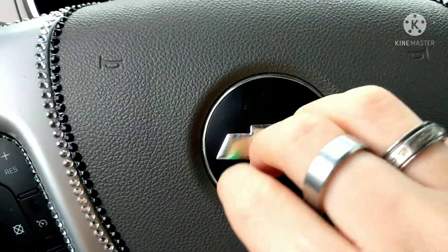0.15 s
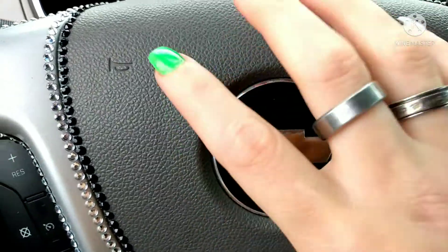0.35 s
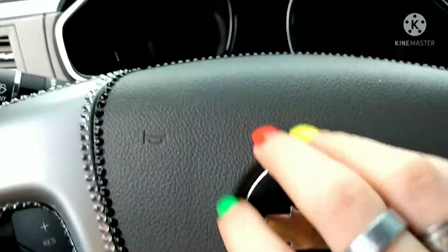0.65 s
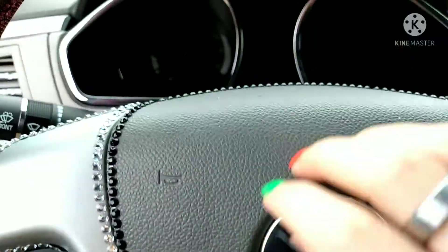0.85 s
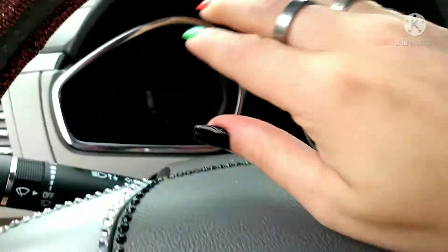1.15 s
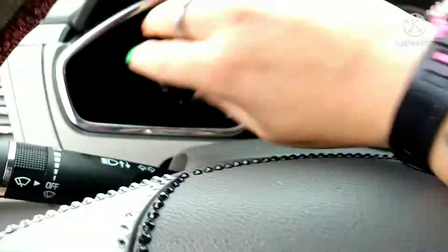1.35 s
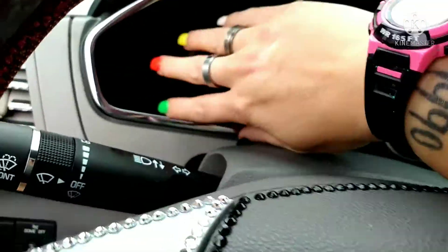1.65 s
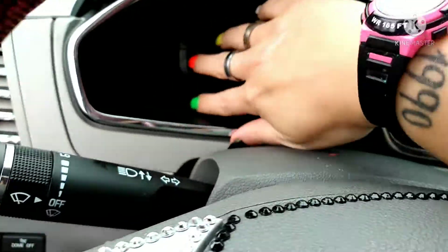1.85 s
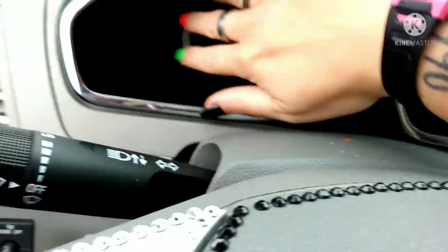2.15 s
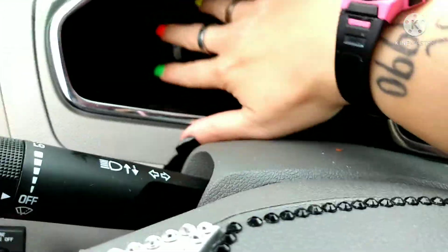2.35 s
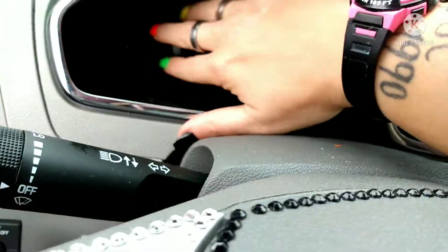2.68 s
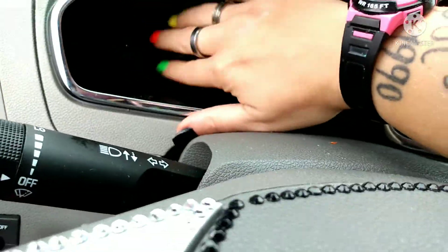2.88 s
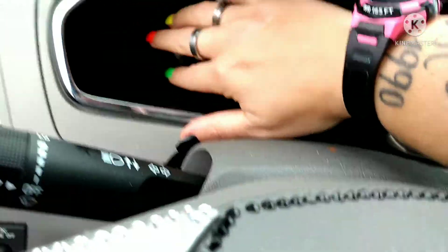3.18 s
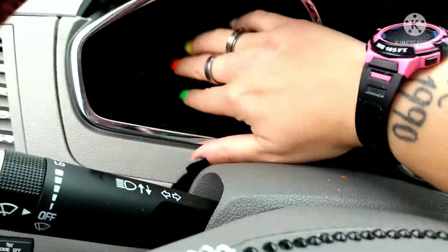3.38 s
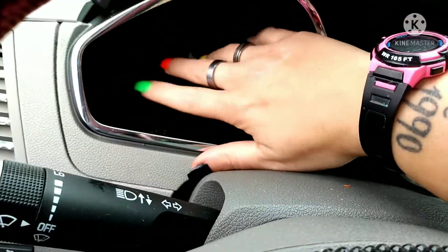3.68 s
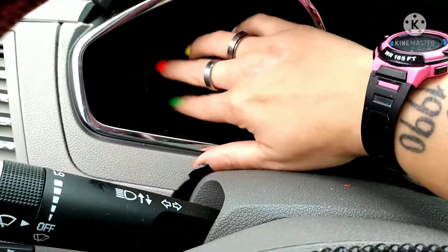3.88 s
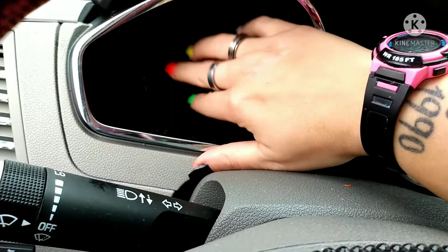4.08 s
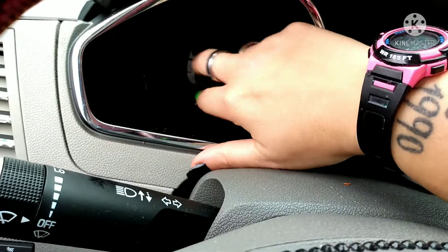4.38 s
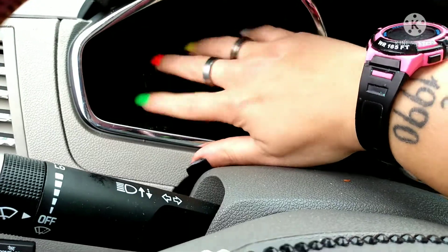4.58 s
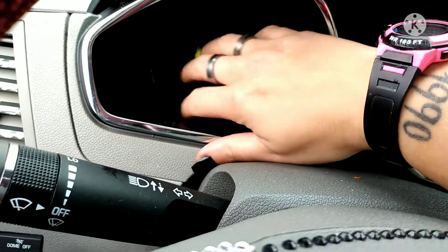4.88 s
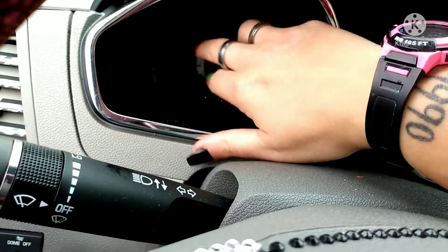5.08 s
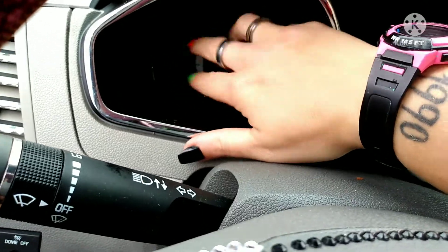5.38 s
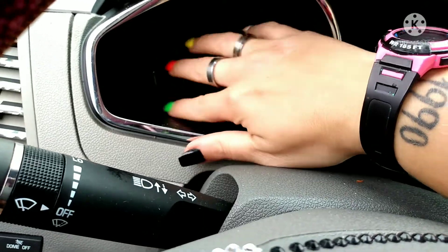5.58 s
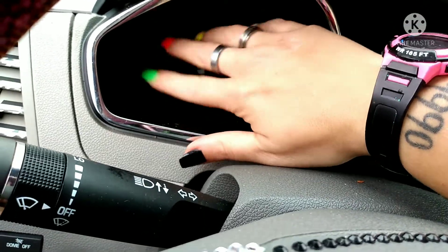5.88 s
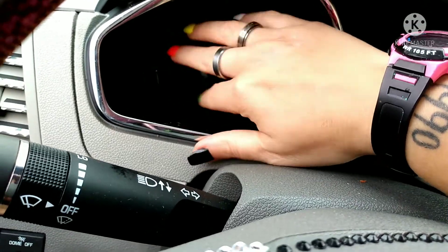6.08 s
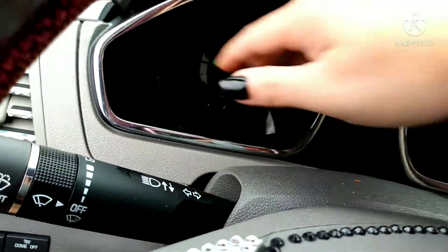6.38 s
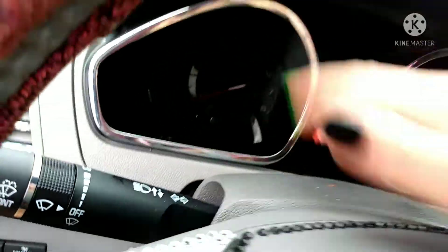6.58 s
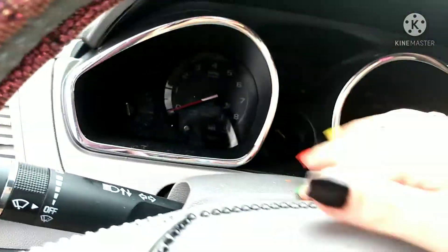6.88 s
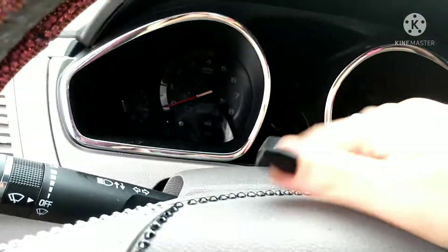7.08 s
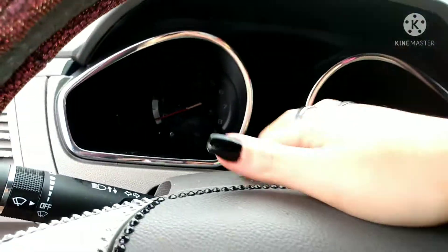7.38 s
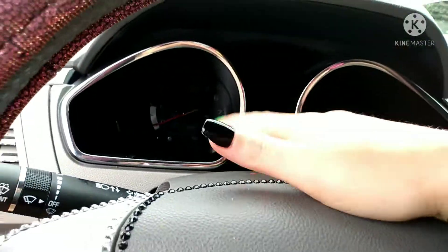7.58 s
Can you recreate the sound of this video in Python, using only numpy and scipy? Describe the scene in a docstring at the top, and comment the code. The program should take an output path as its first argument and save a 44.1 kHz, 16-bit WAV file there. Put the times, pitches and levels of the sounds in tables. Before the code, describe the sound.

Close, dry nail sounds inside a quiet parked car, over a faint low hum and soft air noise. From 0 to 0.3 s a gritty scratch swells across a grained pad, with a tight cluster of firm knocks at 0.14-0.22 s. A second, duller scratch runs from 0.6 to 0.9 s with a strong knock near 0.8. From 1 to 2.4 s there are only faint rubs, tiny ticks and soft bumps. At about 2.45 s nails begin drumming on a hollow clear lens, thickening from 3.1 to 4.5 s into quick, uneven galloping clacks. Looser taps continue to 6.3 s, with gaps, small rubs and dull fingertip thuds around 4.85 and 5.26. After a short lull, quieter hard ticks and brief scrapes on trim run from 6.8 to 7.6 s. Each tap leaves a very short dull echo; treble is limited.

```python
"""Long fingernails scratch and tap the grained pad of a steering wheel, over a low cabin hum.
They then drum in quick runs on the clear plastic lens over the gauges and tick on the hard trim beside it.
Scratches and slides are filtered crackle; taps are decaying modes with a noisy knock and click.
A dull short echo follows the nails in the quiet parked car; a close phone microphone has a narrow band."""
import sys
import numpy as np
from scipy import signal
from scipy.fft import rfft, irfft
from scipy.io import wavfile

SR = 44100
rng = np.random.default_rng(int(sys.argv[2]) if len(sys.argv) > 2 else 0)


def invert_db(x):
    """Field ratio 10**(x/20) for x, a level in decibels (scalar or array-like)."""
    u = np.asarray(x, float) / 20
    return 10 ** u


def int16_out(signal):
    """Quantize to a 16-bit WAV file."""
    q = np.round(np.clip(np.atleast_2d(signal).T, -1, 1) * 32767)
    wavfile.write(sys.argv[1], SR, q.astype(np.int16))


N = 341321

# Spectrum of a nail click. Each row: frequency in Hz, density in dB per Hz.
CLICK_SPECTRUM = [(1500, -24), (3000, -10), (3900, -3), (5200, -6.5), (6500, -2.5), (7500, -3.5)]
# Spectrum of rubbed plastic. Each row: frequency in Hz, density in dB per Hz.
GRAIN_SPECTRUM = [(150, -3), (400, -5), (900, 4.5), (1500, -2), (2500, -10), (4000, -11.5), (8000, -19)]


def evened(x):
    """Scales to rms 1."""
    return x / np.sqrt(np.mean(x ** 2) + 1e-20)


def add(mix, start_s, sound):
    """Mixes a sound in at its start time."""
    part = mix[round(start_s * SR):][:len(sound)]
    part += sound[:len(part)]


def colour(x, spectrum, tilt_db=0):
    """Filters by a (Hz, dB) spectrum, tilted in dB per octave about 1 kHz, no further below 300 Hz."""
    hz = np.fft.rfftfreq(len(x), 1 / SR) + 20
    point_hz, point_db = np.transpose(spectrum)
    gain_db = np.interp(np.log(hz), np.log(point_hz), point_db)
    gain_db += tilt_db * np.log2(np.maximum(hz / 1000, .3))
    return irfft(rfft(x) * invert_db(gain_db), len(x))


def crackle(count, per_s, spread_db, ring_s):
    """A nail skipping over grain: many tiny ticks, a few large, each a brief noise burst, over fine hiss."""
    hit = rng.random(count) < per_s / SR
    size = np.minimum(rng.exponential(1, count), 3.5)
    hiss = rng.standard_normal(count)
    ticks = hit * invert_db(spread_db * size)
    envelope = signal.lfilter([1], [1, -invert_db(-60 / (ring_s * SR))], ticks)
    return evened((envelope + .5) * hiss)


def scratches():
    """Long strokes: crackle through the pad; the nail edge adds treble on its own course."""
    # Two strokes. Each row: time in seconds, pressure in dB, treble in dB re pressure.
    strokes = [
        [(0, -57, -6), (.055, -51, -9), (.075, -45, -2.5), (.12, -41.5, -5), (.14, -40, 3), (.2, -37.5, 3),
         (.23, -49, -15), (.262, -58.5, 7), (.28, -79, -6)],
        [(.6, -74, 6), (.64, -60.5, 6), (.665, -49, -4), (.715, -48, -31), (.74, -40, -26.5), (.81, -37, -19),
         (.835, -46.5, 6), (.87, -55, 2), (.89, -72, 0)],
    ]
    # Scratched pad. Each row: frequency in Hz, density in dB per Hz.
    rasp = [(200, 0), (600, 2), (1200, 6), (2500, 0.5), (4000, -8), (6000, -20.5)]
    out = np.zeros(N)
    for rows in strokes:
        s, pressure_db, treble_db = np.transpose(rows)
        t = np.arange(s[0], s[-1], 1 / SR)
        ticks = crackle(count=len(t), per_s=700, spread_db=3.2, ring_s=.007)
        body = evened(colour(ticks, rasp))
        edge = evened(colour(ticks, CLICK_SPECTRUM, 3.3))
        stroke = body + invert_db(np.interp(t, s, treble_db)) * edge
        add(out, s[0], invert_db(np.interp(t, s, pressure_db)) * stroke)
    return out


def cabin():
    """Soft broad noise of the closed car and a few narrow, wavering humming bands of filtered noise."""
    # Broad noise. Each row: frequency in Hz, density in dB per Hz.
    broad = [(18, -53), (30, -21.5), (81, -4.5), (104, -16), (199, -8.5), (246, -20), (339, -15.5),
             (418, -25), (1010, -29), (7500, -45.5), (9750, -89.5), (16500, -120)]
    # Humming bands. Each row: frequency in Hz, width at half amplitude in Hz, level in dB rms.
    bands = [(80.1, 8.1, -58.5), (110, 63, -75), (148.4, 4, -67), (335.2, 8, -69.5)]
    wide, narrow = rng.standard_normal((2, N))
    hz = np.fft.rfftfreq(N, 1 / SR)
    out = invert_db(-58) * evened(colour(wide, broad))
    for centre_hz, width_hz, level_db in bands:
        resonance = 1 / (1 + ((hz - centre_hz) / width_hz * 2) ** 2)
        out += invert_db(level_db) * evened(irfft(rfft(narrow) * resonance, N))
    return out


def touches():
    """Every blow, thud and tick as (listed time in s, blow dB, spot 0-1 middle to rim, click dB re square)."""
    # Square nail blows. Each row: time in seconds, blow level in dB, spot 0-1 from middle to rim.
    blows = [(0.136, -15, 0.85), (0.162, -17.5, 0.26), (0.206, -17, 0.9), (0.815, -15.5, 0.44),
             (1.866, -40.5, 0.14), (2.459, -23, 0.61), (2.635, -30, 0.2), (2.74, -21.5, 0.8),
             (2.789, -28.5, 0.33), (2.8, -21.5, 0.57), (2.925, -25.5, 0.73), (3.008, -28, 0.3),
             (3.022, -22, 0.53), (3.133, -16, 0.27), (3.255, -37, 0.2), (3.271, -19, 0.45),
             (3.373, -15.5, 0.24), (3.458, -25.5, .33), (3.496, -17, 0.47), (3.616, -18, .27),
             (3.671, -22.5, 0.36), (3.701, -19.5, 0.54), (3.821, -18.5, 0.23), (3.888, -21.5, 0.28),
             (3.933, -21, 0.64), (4.086, -16, 0.16), (4.145, -21.5, 0.29), (4.176, -19.5, 0.4),
             (4.336, -17, 0.33), (4.411, -25, 0.33), (4.455, -19, 0.34), (4.746, -17, 0.32),
             (4.808, -21.5, 0.41), (5.092, -22, .47), (5.331, -40, 0.15), (5.43, -19.5, .43),
             (5.781, -38, 0.33), (5.837, -18, 0.64), (5.892, -25, 0.32), (5.922, -31.5, 0.47),
             (6.066, -20, 0.6), (6.081, -16, 0.3), (6.163, -35, .28), (6.284, -16, .3), (6.303, -20, 0.32),
             (6.791, -25.5, 0.66), (6.805, -24.5, .4), (7.112, -28, 0.56), (7.123, -24.5, 0.54),
             (7.183, -35, .9), (7.233, -34, 0.36), (7.333, -27.5, 0.7), (7.487, -44, 0.9)]
    # Dull blows, as of the fingertip landing first. Each row: time in seconds, blow level in dB, spot 0-1.
    thuds = [(0.171, -14.5, 0.27), (0.218, -28, 0.1), (0.226, -27.5, 0.07), (0.753, -42, .23),
             (0.792, -38, 0.1), (0.85, -21.5, 0.06), (1.051, -41.5, 0.08), (1.931, -43, .02),
             (1.973, -36.5, 0.56), (4.553, -35.5, .93), (4.85, -23.5, 0.39), (4.89, -43, 0.4),
             (4.916, -29, 0.63), (5.16, -38.5, 0.33), (5.189, -30.5, 0.25), (5.259, -19.5, 0.97),
             (5.526, -30.5, 0.28)]
    # Light bright ticks of the nail tip. Each row: time in seconds, blow level in dB.
    ticks = [(0.31, -55), (0.546, -53.5), (0.971, -49.5), (1.359, -51.5), (1.44, -46.5), (1.599, -44),
             (1.63, -41.5), (1.765, -42), (2.414, -37), (2.692, -42), (6.774, -35), (7.016, -31),
             (7.572, -33), (7.584, -29.5)]
    thud_click_db, tick_click_db = -20, 6
    tick_spot = 0.99  # ticks hardly drum
    return ([(*row, 0) for row in blows] + [(*row, thud_click_db) for row in thuds]
            + [(*row, tick_spot, tick_click_db) for row in ticks])


def surface_modes(place, spot, t):
    """The pushed-away surface rings in decaying cosines; returns upper modes and low drumming, each at peak 1."""
    # Modes of each surface. Each row: frequency in Hz, level in dB before the spot's changes, t60 in seconds.
    pad = [(121.4, 0, 0.17), (293, 12, 0.04), (718, -7.5, 0.011), (980, -10.5, 0.015), (1305, -15, 0.005)]
    lens = [(155, -9, .045), (333, 0, .06), (365, 0, .055), (600, -8, .05), (750, -7, .02),
            (825, -11, .065), (888, -8, .058), (1010, -11, .03), (1200, -13, .06), (1340, -19, .05),
            (1520, -8, .025), (1600, -13, .04), (1750, -6, .016), (2300, -15, .035), (2680, -22, .035),
            (3000, -23, .035)]
    trim = [(332, 0, 0.016), (706, -2, 0.037), (885, 10.5, 0.02), (1175, 9, 0.016), (2110, 10.5, 0.0052)]
    hz, mode_db, t60_s = np.transpose([pad, lens, trim][place])[:, :, None]
    chance = rng.standard_normal((len(hz), 1))  # where the nail lands changes each mode's share
    pitch_hz = hz * (1 + .004 * chance[::-1])
    rim = np.clip((spot - .27) / .53, 0, 1)  # near the rim: more and less even upper modes
    share_db = mode_db + (1.5 + 3.5 * rim) * chance + 9.0 * rim * np.log2(hz / 900)
    rings = -invert_db(share_db - 60 * t / t60_s) * np.cos(2 * np.pi * pitch_hz * t - .3)
    rings *= 1 - np.exp(-t / 0.00035)
    rings *= invert_db(-13 * np.clip((t - .015) / .012, 0, 1))  # the following fingertip mutes the ring
    deep = hz[:, 0] < 450
    # opposed neighbours: the drumming swells, then beats
    low = (-1.) ** np.arange(deep.sum()) @ rings[deep]
    upper = rings[~deep].sum(0)
    return upper / abs(upper).max(), low / abs(low).max()


def nail_click(noise, t, lead, sizzle_t60_s, sizzle_db, tilt_db):
    """A two-sample push with a decaying noise sizzle, filtered and scaled to a fixed energy."""
    sizzle = invert_db(sizzle_db - 60 * t / sizzle_t60_s) * noise / 4
    sizzle[:2] -= 1
    fade_in = np.minimum(t * SR / lead, 1) ** 2
    click = colour(np.roll(sizzle, lead), CLICK_SPECTRUM, tilt_db) * fade_in
    return click / np.sqrt((click ** 2).sum() / 100)


def taps():
    """Each blow rings the surface's modes, knocks, and leaves a click with a short sizzle."""
    # Times in seconds when the hand moves from pad to lens and from lens to trim.
    hand_moves_s = [1.2, 6.5]
    # Click of a square blow on pad, lens and trim, in dB re blow.
    square_click_db = [-1, -10.5, -8.5]
    # Unpitched ringing of pad, lens, trim. Each row: sizzle t60 in seconds, sizzle in dB re a quarter of
    # the click's push, click tilt in dB per octave, knock in dB re half the upper modes' peak,
    # knock t60 in seconds.
    dense = [(.02, 11, 7, -1, 0.024), (.045, -9, -1.5, -1.5, 0.032), (.045, -5.5, -2, 0, .05)]
    drum_middle_db, drum_rim_db = -1, -29  # low drumming re blow
    lead, delay_s = 40, .0014  # samples ahead of a filtered click; from the listed time to the sound's start
    out, t = np.zeros(N), np.arange(SR // 5) / SR
    alike = rng.standard_normal((3, len(t)))  # the same object rings alike blow after blow
    for s, blow_db, spot, nail_db in touches():
        place = np.searchsorted(hand_moves_s, s)
        sizzle_t60_s, sizzle_db, tilt_db, knock_db, knock_t60_s = dense[place]
        noise = 0.24 * alike[place] + rng.standard_normal(len(t))
        click = nail_click(noise, t, lead, sizzle_t60_s, sizzle_db, tilt_db)
        click_db = blow_db + square_click_db[place] + nail_db
        add(out, s + delay_s - lead / SR, invert_db(click_db) * click)

        upper, low = surface_modes(place, spot, t)
        knock = evened(colour(noise, GRAIN_SPECTRUM, -0.5)) * invert_db(knock_db - 60 * t / knock_t60_s) / 2
        low_db = drum_middle_db + (drum_rim_db - drum_middle_db) * spot
        add(out, s + delay_s, invert_db(blow_db - 3.0) * (upper + knock) + invert_db(blow_db + low_db) * low)
    return out


def slides():
    """Short rubs of nail or hand: dense fine crackle that rises, may hold, and stops."""
    # Each row: start in seconds, level in dB rms before the swell, length in seconds, tilt in dB per octave.
    rubs = [(0.427, -56.5, 0.033, 0.5), (0.984, -46.5, 0.062, 0), (1.434, -64, 0.14, 3.5),
            (1.568, -60, 0.11, -0.5), (1.852, -53, 0.12, -1.5), (2.017, -56, 0.059, -0.5),
            (2.393, -56.5, 0.15, 1.5), (2.628, -45.5, 0.048, 3), (4.513, -43.5, .016, 4.5),
            (4.529, -57, .028, 2.5), (4.86, -55, 0.12, -0.5), (5.004, -57, 0.025, 1),
            (5.334, -60.5, 0.038, 1), (5.541, -59, 0.068, -1), (6.362, -62.5, 0.26, 1),
            (6.821, -46, 0.053, 0.5), (7.136, -55.5, 0.048, 1), (7.195, -52.5, 0.03, -1),
            (7.33, -51, 0.06, 1), (7.396, -53, 0.03, 2), (7.424, -43.5, 0.023, 1.5),
            (7.504, -58.5, 0.03, -1.5), (7.615, -47.5, 0.046, 1.5)]
    swell_per_s, stop_share = 1.18, 0.31  # rise as share of length, per s of length; stop as share of length
    out = np.zeros(N)
    ticks = crackle(count=N, per_s=900, spread_db=1.5, ring_s=.012)
    for s, level_db, length_s, tilt_db in rubs:
        u = np.arange(round(length_s * SR)) / (length_s * SR)
        rise = u / (swell_per_s * length_s)  # longer slides start more gently
        shape = np.minimum(np.minimum(rise, (1 - u) / stop_share), 1)
        rub = evened(colour(ticks[round(s * SR):][:len(u)], GRAIN_SPECTRUM, tilt_db))
        add(out, s, invert_db(level_db) * rub * shape)
    return out


def echo(x):
    """Glass and seats return a faint, dull tail: three noise tails, cross-faded in a steady cycle."""
    t = np.arange(SR // 4) / SR
    turn = np.arange(N) / SR * 7.3  # half cycles
    out = np.zeros(N)
    for k, noise in enumerate(rng.standard_normal((3, len(t)))):
        tail = colour(noise, GRAIN_SPECTRUM, -3.9) * invert_db(-60 * t / 0.086) * np.minimum(t / 0.0022, 1)
        share = np.sqrt(2 / 3) * np.cos(np.pi * (turn + k / 3))  # so that no one tail colours the echo
        out += signal.fftconvolve(x * share, tail / np.linalg.norm(tail))[:N]
    return invert_db(-19) * out


def scene():
    """Nails, their echo and the cabin."""
    nails = scratches() + taps() + slides()
    return (nails + echo(nails) + cabin())[None]


def roll_off(x):
    """The treble ends steeply here."""
    return signal.sosfilt(signal.butter(12, 8870, fs=SR, output="sos"), x)


def record(dry):
    """The phone's low-pass keeps a narrow band; a faint wide hiss lies over it."""
    edge_hz, hiss_db = 7895, -84.5  # hiss in dB rms
    low_pass = signal.firwin(161, edge_hz, window=("kaiser", 9), fs=SR)
    hiss = invert_db(hiss_db) * rng.standard_normal(dry.shape)
    mix = signal.oaconvolve(dry, low_pass[None], "same") + hiss
    return roll_off(mix)


dry = scene()
out = record(dry)
int16_out(out)
```